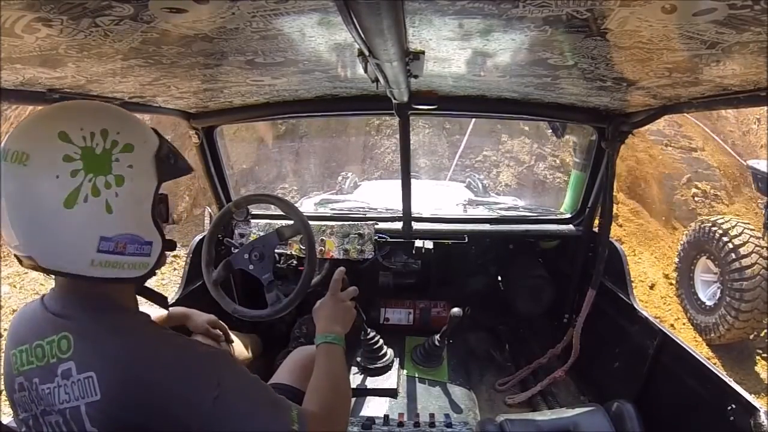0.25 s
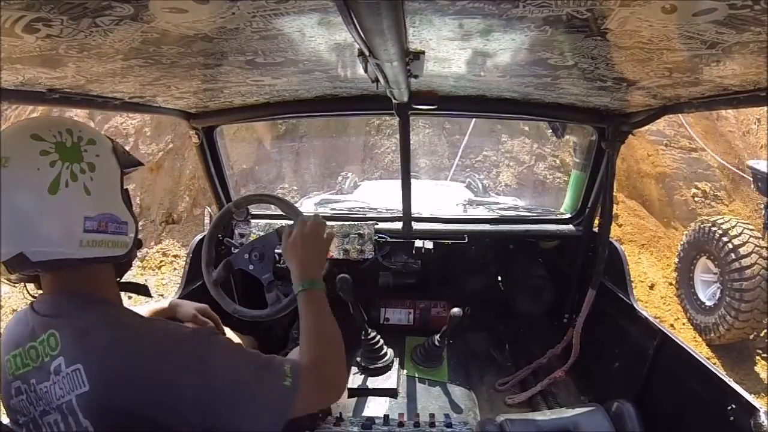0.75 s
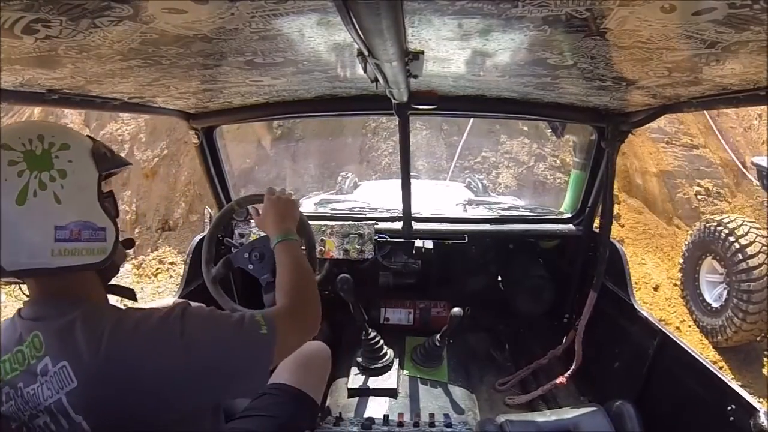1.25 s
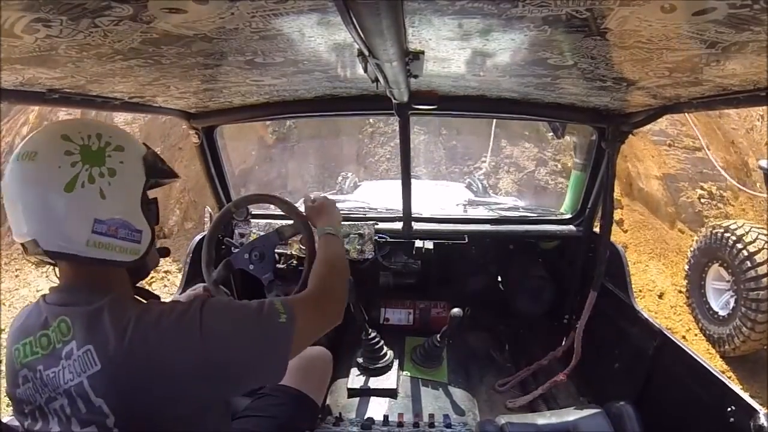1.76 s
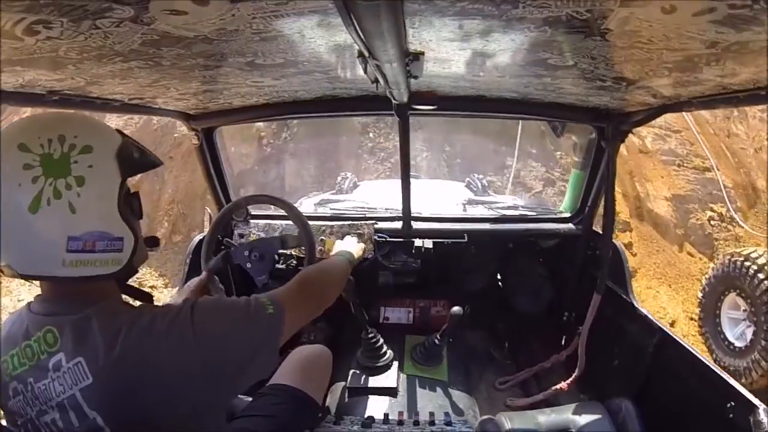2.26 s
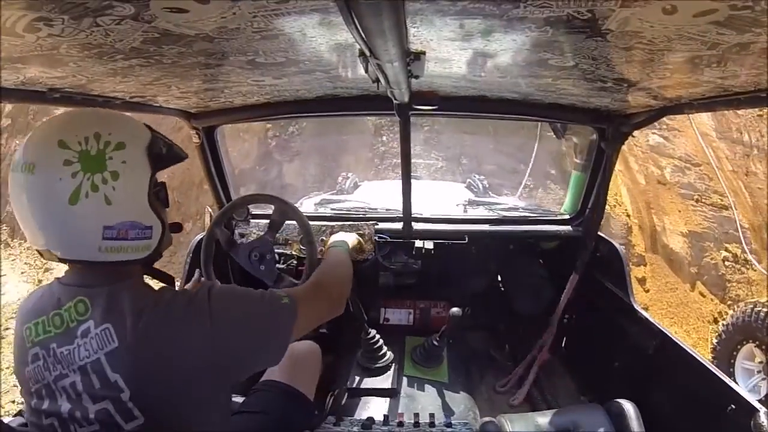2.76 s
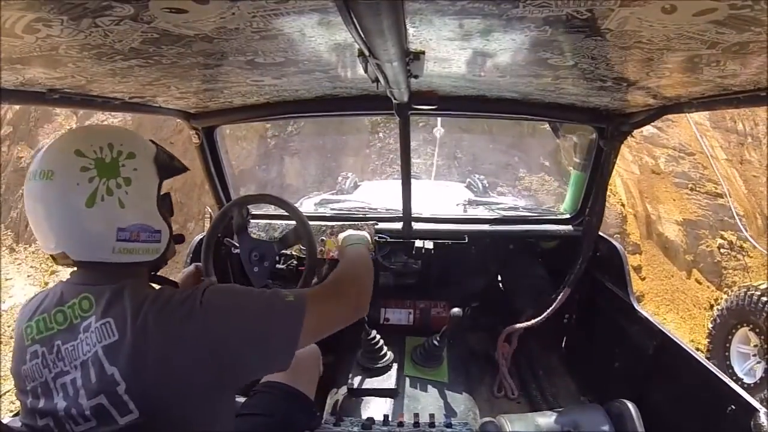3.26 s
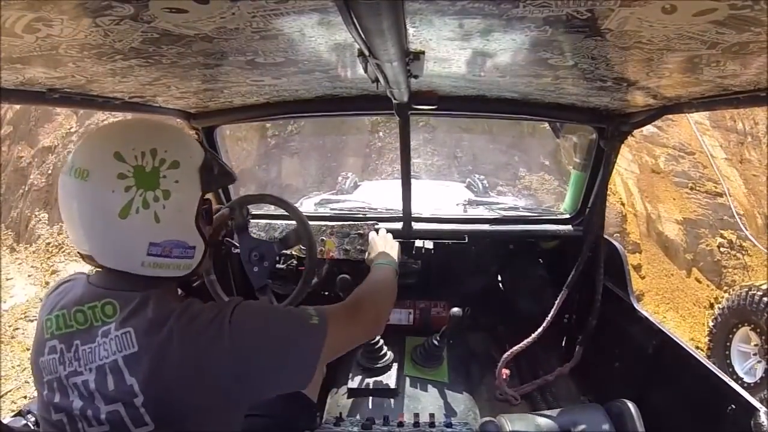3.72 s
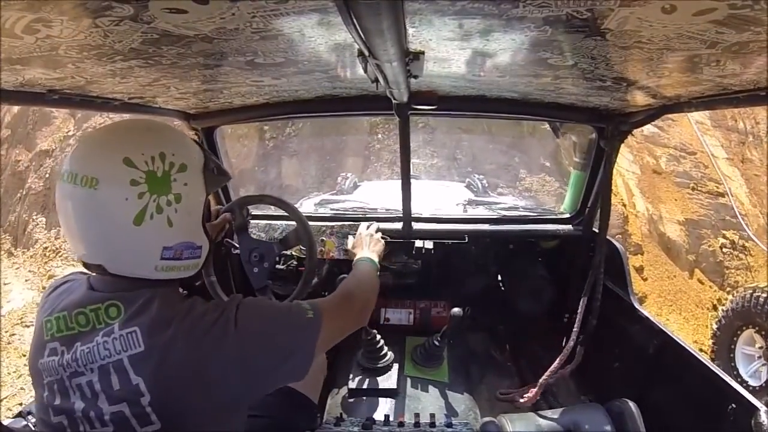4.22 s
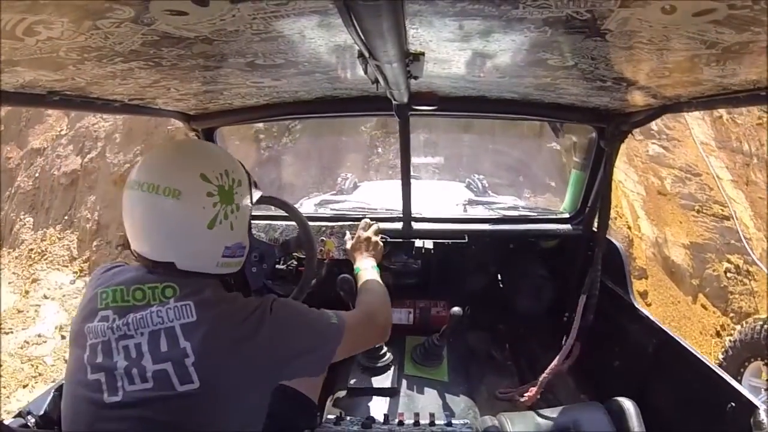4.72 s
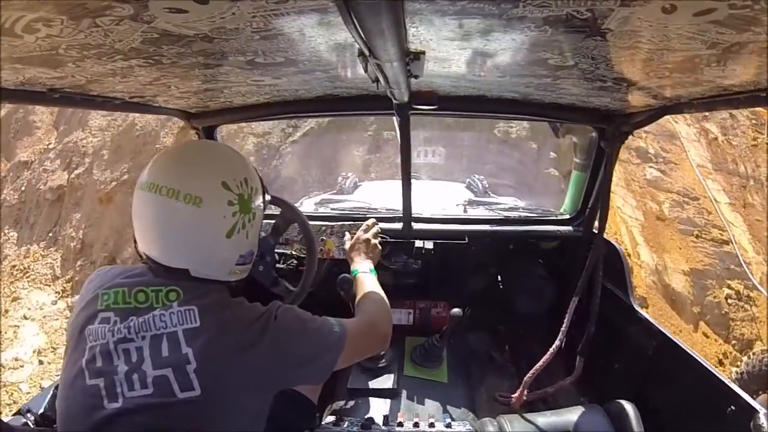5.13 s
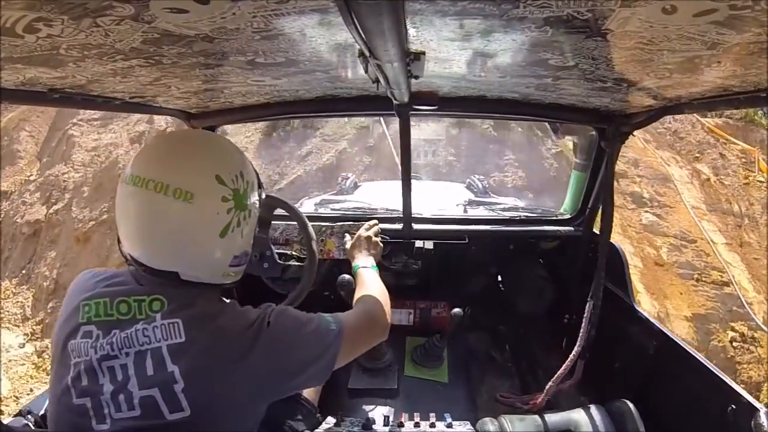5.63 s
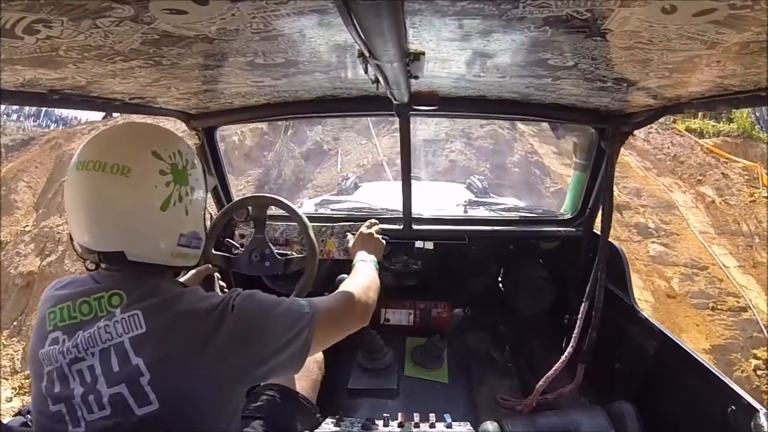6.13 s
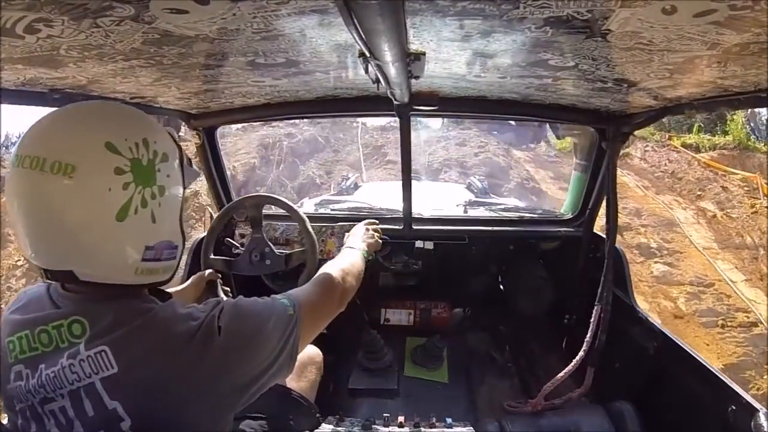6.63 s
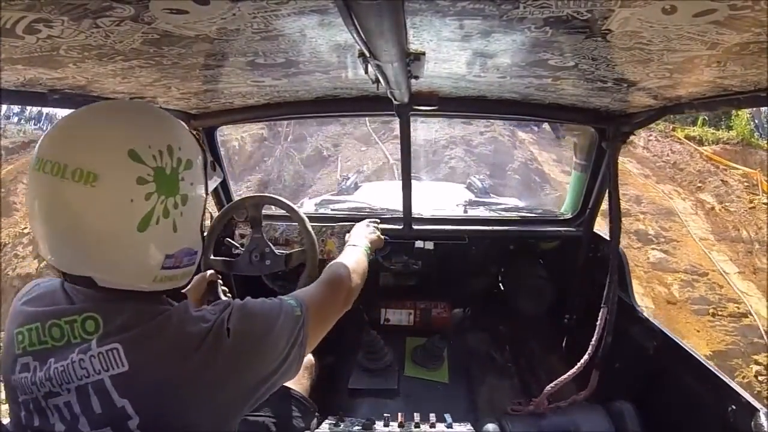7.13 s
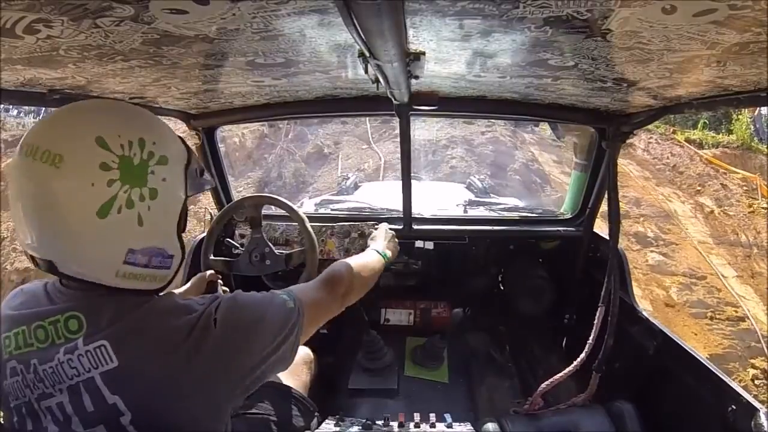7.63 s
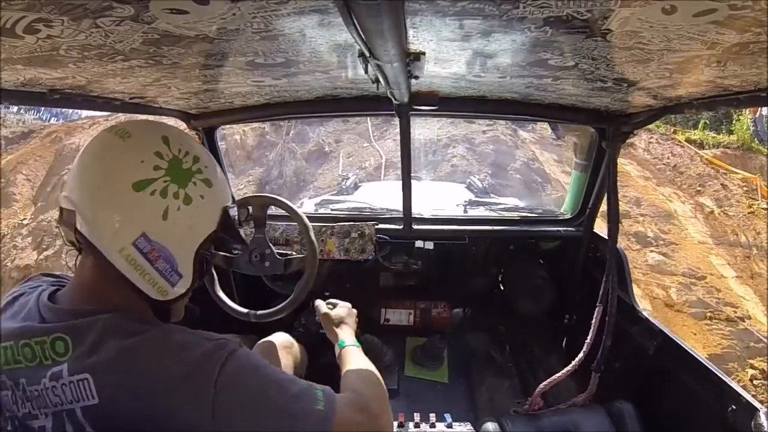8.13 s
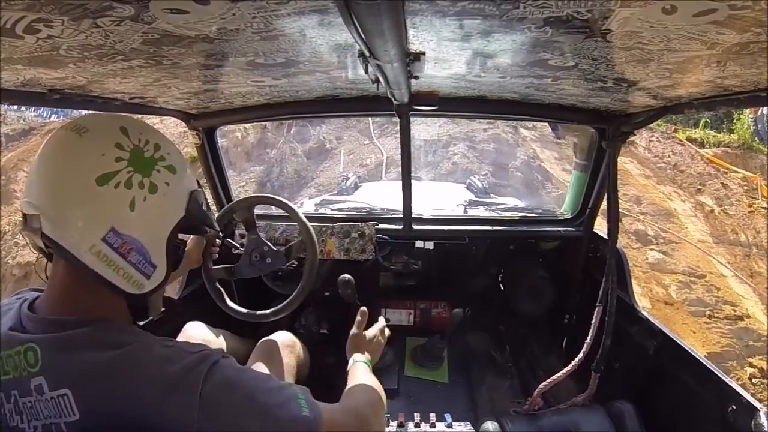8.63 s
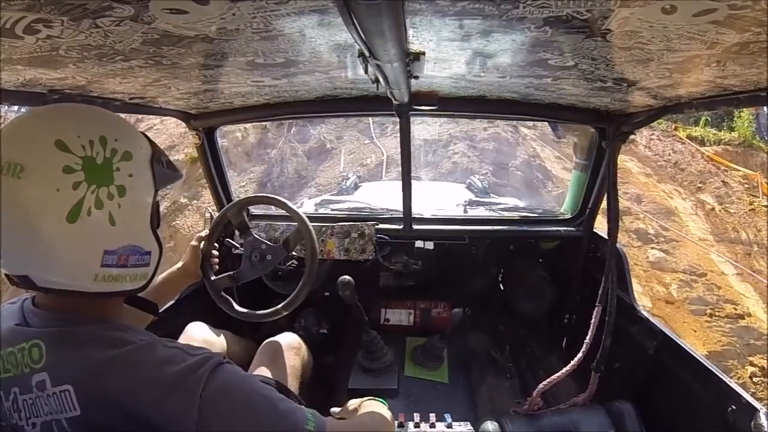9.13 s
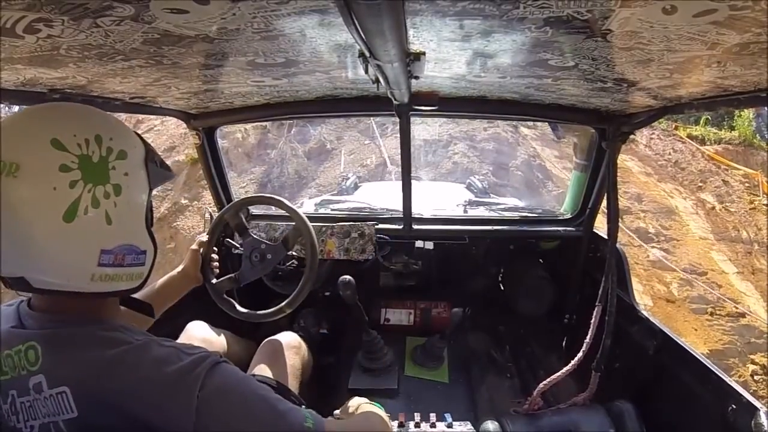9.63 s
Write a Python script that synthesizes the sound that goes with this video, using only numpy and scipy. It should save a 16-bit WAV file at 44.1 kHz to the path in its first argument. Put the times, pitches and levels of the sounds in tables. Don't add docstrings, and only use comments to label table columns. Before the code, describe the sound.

Inside a bare metal buggy cabin, a microphone in a sealed housing hears a boomy, throbbing engine at about 50 beats a second, with dry clatter, hiss and faint gear whine. At 1.0 and 1.2 s hard chassis clunks hit. The revs sag to a slow, separate chug by 2.4 s, then surge back by 3 s amid dull taps. A breathy turbine whistle sweeps upward around 3.5-4 s and runs down. Three sharp knocks come at 4.3 s as the engine lugs again to 4.9 s. From 5 to 6.7 s a loose mount hammers the housing, almost every beat. At 6.9 s a jolt lifts the revs; heavy thuds follow at 7.5 s and a bright clunk at 7.6 s with a falling squeak. Scattered knocks thicken into ringing chatter from 8.65 s, with a wavering squeak near 9.4 s, continuing to the end at 9.9 s.

```python
import sys
import numpy as np
from scipy import signal
from scipy.fft import rfft, irfft, next_fast_len
from scipy.io import wavfile
from scipy.ndimage import uniform_filter1d, minimum_filter1d

SR = 44100
rng = np.random.default_rng(int(sys.argv[2]) if len(sys.argv) > 2 else 0)


def linear_from_db(decibels):
    return 10 ** (np.asarray(decibels, float) / 20)


def bounce(signal):
    frames = np.transpose(np.atleast_2d(signal))
    limited = np.clip(frames, -1, 1)
    pcm = np.round(limited * 32767).astype(np.int16)
    wavfile.write(sys.argv[1], SR, pcm)


N = 435266

# time in seconds, load in dB.
LOAD = [(0, -0.8), (2.58, 1.7), (2.76, -15), (2.93, 1.5), (3.23, -9.5), (3.55, -10.5), (3.74, -16.5),
        (4.05, -0.5), (4.9, 1.7), (5.44, -17), (5.86, -2.5), (6.3, -21.5), (6.8, -8.5), (7.4, -2), (8.5, 3),
        (8.9, -5), (9.3, 0), (9.87, -17)]
# Hz, level in dB struck low on the mount,
# level in dB struck high on it, time to fall 60 dB in seconds.
HOUSING = [(165, -18.5, -15.5, 0.041), (240, -19.5, -16.5, 0.028), (333, -22.5, -17, 0.038),
           (706, -19, -19, 0.033), (819, -18.5, -14, 0.028), (950, -27.5, -24, 0.034),
           (1178, -15, -16.5, 0.097), (1450, -1, -4, 0.024), (1622, 1, 1.5, 0.015), (1792, -5, -1.5, 0.02),
           (2050, -15.5, -17.5, .02), (2418, -11.5, -9, 0.015), (2825, -23, -18.5, .012)]
USUAL_HZ = 47
USUAL_INTAKE_DB = -50


def evened(x):
    return x / np.sqrt(np.mean(x ** 2) + 1e-20)


def columns(rows):
    s, *values = np.transpose(rows)
    return [np.interp(np.arange(N) / SR, s, v) for v in values]


def add(mix, s, sound):
    part = mix[round(s * SR):][:len(sound)]
    part += sound[:len(part)]


def resonate(x, hz, width):
    turn = np.exp(2j * np.pi * np.cumsum(hz * np.ones(len(x))) / SR)
    r = np.exp(-np.pi * width / SR)
    return 2 * (turn * signal.lfilter([1 - r], [1, -r], x / turn)).real


def resonate_twice(x, hz, width):
    return resonate(resonate(x, hz, width), hz, width)


def coloured(x, points):
    hz, db = np.transpose(points)
    size = next_fast_len(N)
    log_hz = np.log(np.fft.rfftfreq(size, 1 / SR) + 1)
    gain = linear_from_db(np.interp(log_hz, np.log(hz), db, -120, -120))
    return evened(irfft(rfft(x, size) * gain, size)[:N])


def drift(rate_hz):
    return evened(resonate_twice(rng.standard_normal(N), 0, rate_hz))


def mottled(x):
    z = signal.stft(x, nperseg=512, noverlap=384)[2]
    patches = uniform_filter1d(rng.standard_normal(z.shape[::-1]), size=12, axis=0)
    patches = uniform_filter1d(patches, size=3, axis=1)
    swell_db = 2.2 * evened(patches).T - .6
    return signal.istft(z * linear_from_db(swell_db), nperseg=512, noverlap=384)[1][:N]


def glide(rows, width, clean):
    hz, db = columns(rows)
    t = np.arange(N) / SR
    fuzz = evened(resonate_twice(rng.standard_normal(N), hz, width))
    tone = clean * np.sin(2 * np.pi * np.cumsum(hz) / SR) + fuzz
    return linear_from_db(db) * evened(tone) * (t > rows[0][0]) * (t < rows[-1][0])


def surge():
    # time in seconds, intake level in dB.
    intake = [(0, -44.5), (1.01, -44), (1.29, -50.5), (1.84, -52), (2.09, -59), (3.08, -54.5),
              (3.95, -39.5), (3.98, -42.5), (4.62, -55.5), (5.39, -51.5), (5.99, -55), (6.24, -56),
              (6.74, -55.5), (7.01, -49.5), (7.56, -47), (7.94, -51), (8.69, -46), (9.87, -53)]
    return columns(intake)[0] - USUAL_INTAKE_DB


def loosened():
    return np.clip((np.arange(N) / SR - 6.85) / 0.083, 0, 1)


def gear_whines():
    # time in seconds, Hz, level in dB.
    whines = [
        [(5.2, 5370, -72), (5.3, 5230, -54), (5.42, 5000, -64), (5.6, 5120, -73), (5.9, 5070, -57),
         (6.05, 5050, -70)],
        [(6.55, 4260, -80), (6.8, 4200, -63.5), (7.1, 4167, -66)],
        [(7.0, 7680, -71), (7.55, 7666, -63), (7.85, 7670, -61)],
        [(0, 3945, -50.5), (1.1, 4000, -52.5), (1.6, 3970, -63), (2.0, 3940, -56.5), (2.2, 3890, -67),
         (3.05, 3930, -64), (3.16, 3970, -53), (3.45, 3840, -61), (4.2, 3840, -74)],
        [(0, 6800, -64), (.6, 7120, -68), (1.2, 7000, -65)],
    ]
    return sum(glide(rows, 45, .3) for rows in whines)


def turbine_whistle():
    # time in seconds, Hz, level in dB.
    whistle = [(3.5, 4100, -63), (3.58, 4500, -55), (3.69, 5300, -50), (3.82, 7100, -43.5),
               (3.955, 9400, -54), (3.98, 9250, -67), (4.2, 8900, -62), (4.4, 8400, -64), (4.65, 7700, -71)]
    return glide(whistle, 310, .4)


def squeaks():
    # time in seconds, Hz, level in dB.
    curves = [
        [(7.67, 1610, -38), (7.69, 1550, -26), (7.72, 1460, -23), (7.74, 1390, -27), (7.765, 1280, -36)],
        [(9.36, 1600, -43), (9.4, 1580, -28), (9.44, 1540, -37), (9.475, 1590, -24), (9.505, 1590, -31),
         (9.525, 1600, -35)],
    ]
    return sum(glide(rows, 70, 1.6) for rows in curves)


def chatter_hum():
    # time in seconds, Hz, level in dB.
    buzz = [(8.8, 840, -42.5), (8.9, 850, -48), (9.4, 805, -47), (9.95, 803, -33)]
    # time in seconds, Hz, level in dB.
    plate = [(8.8, 1560, -48), (8.95, 1550, -32), (9.03, 1480, -48), (9.12, 1580, -36), (9.3, 1610, -60),
             (9.4, 1530, -26.5), (9.5, 1540, -37.5), (9.62, 1525, -30.5), (9.95, 1620, -31.5)]
    return glide(buzz, 90, 0) + glide(plate, 300, 0)


def shell():
    # Hz, width in Hz, level in dB.
    modes = [(38.2, 7.9, -2.5), (91.34, 6.15, -1.5), (149, 21, -16)]
    # time in seconds, low mode in dB, high mode in dB.
    bumps = [(1.022, -18, -25), (1.207, -23, -9), (2.62, -19, 0), (2.951, -12, -45), (3.853, -30, -32),
             (5.33, 3.5, -32), (6.861, 0, 5), (7.002, -26, -21), (7.493, 3.5, 5.5), (7.782, -7, 6),
             (8.098, -23, -26), (8.651, 4, -3)]
    # time in seconds, road shake in dB.
    ground = [(0, -14), (.88, -39), (1.03, -11), (1.3, -19), (2.01, -26), (2.55, -39), (2.8, -24.5),
              (3.4, -21.5), (4, -13.5), (4.45, -22.5), (4.95, -37), (6, -25.5), (6.7, -29.5), (7.1, -21.5),
              (8.5, -23.5), (9.87, -22)]
    road = rng.standard_normal(N)
    hum = sum(linear_from_db(db) * evened(resonate(resonate(road, hz, w), hz, 2 * w)) for hz, w, db in modes)
    out = linear_from_db(columns(ground)[0]) * hum
    t = np.arange(SR // 2) / SR
    for s, *dbs in bumps:
        for db, (hz, width, _) in zip(dbs, modes):
            swell = (1 - np.exp(-t / 0.06)) * np.exp(-np.pi * width * t)
            add(out, s, linear_from_db(db) * swell * np.sin(2 * np.pi * hz * t))
    return out


def thuds():
    # start in seconds, Hz, peak in dB, time to fall 60 dB in seconds.
    blows = [(.97, 600, -36, 0.067), (1.199, 328, -36, 0.044), (2.6, 393, -28, 0.038),
             (4.301, 240, -23, 0.025), (5.029, 209, -27, 0.13), (4.763, 1416, -27, .05),
             (4.82, 1450, -32, 0.059), (5.284, 1545, -29.5, 0.046), (5.362, 1370, -33, 0.1),
             (2.0, 414, -31, 0.038), (2.738, 327, -33.5, 0.061), (6.86, 645, -27.5, 0.047),
             (7.065, 620, -24, 0.037), (7.49, 477, -16.5, 0.035), (7.509, 338, -23, 0.045),
             (7.638, 568, -16.5, 0.036), (7.636, 1900, -21, 0.05), (7.636, 1200, -20, 0.044),
             (7.645, 800, -27, .03), (7.747, 400, -21, 0.028), (7.774, 312, -19, 0.041),
             (7.857, 390, -29, 0.048), (8.622, 352, -19, 0.021), (8.653, 328, -32, 0.15),
             (8.792, 415, -29, 0.046), (9.363, 450, -32, 0.15), (9.45, 450, -27.5, 0.11)]
    sag, sag_s, jolt_s = .25, .015, .013
    out, jolts = np.zeros(N), np.zeros(N)
    t = np.arange(SR // 2) / SR
    for s, hz, db, t60 in blows:
        low = hz < 540
        bent_t = t - low * sag * sag_s * np.exp(-t / sag_s)
        swell = linear_from_db(db + 9.0 - 60 * t / t60) * (1 - np.exp(-(t / 0.0073) ** 2))
        add(out, s, swell * np.sin(2 * np.pi * hz * bent_t))
        add(jolts, s, low * linear_from_db(db - 12.5) * t / jolt_s * np.exp(1 - t / jolt_s))
    rumble = coloured(rng.standard_normal(N), [(120, -11.5), (200, 6.5), (500, -6), (900, -9), (1050, -24.5)])
    return out + jolts * rumble


def clunks():
    # start in seconds, peak in dB, brightness in dB an octave, length in seconds.
    clusters = [
        (1.006, -11, 0, 0.013),
        (1.207, -16, -3, 0.009),
        (1.268, -31, 8, 0.0022),
        (2.566, -30, -10, 0.089),
        (2.676, -29, -8, 0.0033),
        (2.723, -36, -4, 0.0024),
        (2.803, -20, 2, 0.017),
        (3.085, -25, -2, 0.0042),
        (3.84, -18.5, -5.5, 0.0092),
        (7.632, -11, 5, 0.015),
    ]
    # Hz, width in Hz, level in dB.
    chassis = [(640, 126, -3), (822, 32, -1), (1370, 73, 4), (1620, 120, 6.5), (1792, 96, 1.5),
               (2120, 320, -26.5)]
    out, t = np.zeros(N), np.arange(4000) / SR
    for s, peak_db, bright_db, length in clusters:
        c = rng.standard_normal(len(t))
        contacts = c * abs(c) * (t / length) * np.exp(-(t / length) ** 2)
        sound = sum(linear_from_db(db + bright_db * np.log2(hz / 1500)) * resonate(resonate(contacts, hz, w), hz, 2 * w)
                    for hz, w, db in chassis)
        add(out, s - .002, linear_from_db(peak_db) * sound / abs(sound).max())
    return out


def ticks(turns, rate):
    at = np.flatnonzero(np.diff(np.floor(turns + 0.81)))
    taps = np.zeros(N)
    taps[at] = linear_from_db(2.4 * rng.standard_normal(len(at)))
    t = np.arange(300) / SR
    parts = [(760, 3.0, 0.00035), (1790, -9.5, 0.00037), (3220, -13.5, 0.00013),
             (4630, -11.0, 0.0003), (2600, -13.5, 0.0001)]
    tick = sum(linear_from_db(db) * np.sin(2 * np.pi * hz * t) * t / s * np.exp(1 - t / s) for hz, db, s in parts)
    faster_hz = rate - USUAL_HZ
    tick_db = -54 - 1.4 * faster_hz - 0.42 * columns(LOAD)[0] + 7 * loosened()
    snap = np.exp(-((t - .001) / .00005) ** 2) - np.exp(-((t - .001) / .0004) ** 2) / 8
    snap_db = -56 - 1.3 * faster_hz
    snaps = signal.oaconvolve(linear_from_db(snap_db) * taps, snap / abs(snap).max())[:N]
    return signal.oaconvolve(linear_from_db(tick_db) * taps, tick)[:N] + snaps


def clatter(turns, rate, mount):
    # Hz, dB per Hz.
    rumble_points = [(74, -12), (125, -9.5), (146, -14), (244, -26), (366, -26), (415, -35.5), (462, -29.5),
                     (652, -29), (713, -35.5), (809, -31), (1080, -44), (1400, -87), (2380, -120)]
    body_points = [(590, -41.5), (1000, -43), (1070, -47.5), (1150, 4), (1330, 8.5), (1560, 11), (2040, 0),
                   (2410, -2), (2590, -13.5), (2900, -36), (3770, -38.5), (6380, -120)]
    hiss_points = [(1530, -38.5), (2600, -2.5), (3160, 5.5), (3720, 5), (3890, 3.5), (4100, 0), (4160, -12),
                   (4340, -6.5), (4530, -8.5), (5010, 3), (5450, -2.5), (8020, -6), (9200, -26.5),
                   (12000, -58.5), (20200, -120)]
    air_points = [(5000, -27), (8500, -1.5), (9090, -6.5), (11100, -6.5), (12200, -9), (13500, -12),
                  (15100, -12.5)]
    # Hz, width in Hz, level in dB.
    hums = [(3970, 93, -21), (5077, 110, -11.5), (7190, 50, -25.5)]
    dropouts = [.54, 4.44, 4.737, 5.3, 5.5, 8.17, 8.56]
    slowness = (47 / rate) ** 3.5
    strength = linear_from_db(2.5 * rng.standard_normal(int(turns[-1]) + 1))[(turns - .88).astype(int)]
    puff = slowness * strength * np.exp(-(((turns + .12) % 1) / .45) ** 2)

    def band(points, depth):
        swell = (1 + depth * puff) / (1 + 0.19 * depth * slowness)
        return coloured(swell * rng.standard_normal(N), points)

    rumble, body = band(rumble_points, .5), band(body_points, .6)
    hiss, air = band(hiss_points, .25), band(air_points, .2)
    noise = rng.standard_normal(N)
    for hz, width, db in hums:
        hiss = hiss + linear_from_db(db + 3.0 * drift(8.6)) * evened(resonate_twice(noise, hz, width))

    shaken = np.sqrt(abs(resonate(mount ** 2, 0, 1 / (np.pi * 0.011))))
    rumble_db = -34.5 + 0.58 * surge() + 0.094 * columns(LOAD)[0] + 3 * loosened()
    low = (linear_from_db(rumble_db) + linear_from_db(-19.5) * shaken) * rumble
    body_db = -40.5 + 0.8 * surge() + 1.5 * loosened() + 0.23 * np.minimum(rate - 40, 0)
    lug_db = -57 - (rate - USUAL_HZ)
    lug = evened((slowness + 1.5 * puff) * resonate_twice(noise, 1826, 240)) / slowness

    hiss_db = surge() + USUAL_INTAKE_DB
    air_db = 1.1 * surge() - 63.5
    dips = sum(np.exp(-((np.arange(N) / SR - s) / .011) ** 4) for s in dropouts)
    flicker = linear_from_db(1.28 * drift(8.1) - 14 * dips)
    treble = flicker * mottled(linear_from_db(hiss_db) * hiss + linear_from_db(air_db) * air)
    return low + linear_from_db(body_db) * body + linear_from_db(lug_db) * lug + treble


def ring(s, chance_db):
    signs = [1, -1, 1, -1, 1, -1, -1, 1, -1, 1, 1, 1, -1]
    t = np.arange(4000) / SR
    hz, low_db, high_db, t60 = np.transpose(HOUSING)[:, :, None]
    db = (low_db if s < 7.5 else high_db) + chance_db[:, None]
    sound = (np.c_[signs] * linear_from_db(db - 60 * t / t60) * np.sin(2 * np.pi * hz * t)).sum(0)
    sound *= np.sin(np.pi / 2 * np.minimum(t / 0.0013, 1)) ** 2
    add(sound, 0.00477, linear_from_db(-16.5 + 2 * chance_db[0]) * sound)
    return sound / abs(sound).max()


def knocks():
    # time in seconds, peak in dB.
    mount_blows = [(1.0115, -18), (1.2105, -21), (2.807, -27.5), (4.978, -24), (6.737, -31), (6.9801, -19),
                   (7.5362, -17.5), (7.142, -29), (7.515, -21), (7.591, -29), (7.6397, -20), (7.817, -26.5),
                   (7.836, -31), (7.89, -30), (9.002, -35), (9.44, -21), (9.4815, -21), (9.503, -22),
                   (4.28, -18), (4.3034, -10.0), (4.326, -6), (4.737, -24), (4.948, -23.5), (4.983, -16),
             (5.0084, -8.5), (5.0373, -8), (5.0586, -23), (5.0901, -4.5), (5.4059, -9.5), (5.427, -6.5),
             (5.4502, -10), (5.472, -3), (5.494, -6.5), (5.5159, -3.5), (5.5378, -10), (5.5606, -6.5),
             (5.583, -11.5), (5.604, -7.5), (5.628, -17), (5.649, -8.5), (5.692, -9), (5.78, -10.5),
             (5.931, -9), (5.973, -5), (5.998, -22), (6.0176, -6.5), (6.0424, -37), (6.0618, -7.5),
             (6.1081, -9.5), (6.1533, -9.5), (6.178, -29), (6.198, -4), (6.224, -23), (6.2416, -4.5),
             (6.2649, -8), (6.287, -11), (6.3111, -4), (6.3326, -4.5), (6.3567, -5.5), (6.38, -4.5),
             (6.4028, -4.5), (6.4264, -5.5), (6.449, -5), (6.4722, -3), (6.4946, -4.5), (6.518, -5),
             (6.5416, -7), (6.565, -9.5), (6.588, -16), (6.6139, -16.5), (6.6355, -10), (6.6619, -17.5),
             (6.685, -26), (6.71, -20), (6.7602, -20.5),
                   (7.697, -30), (7.7218, -19), (7.7879, -20), (7.929, -14), (7.9533, -21), (7.9907, -23),
             (8.0299, -13), (8.143, -18.5), (8.274, -21.5), (8.4093, -15), (8.55, -28), (8.585, -20),
             (8.6613, -5.5), (8.679, -9.5), (8.7217, -9.5), (8.7547, -23.5), (8.858, -23.0),
             (8.8789, -10.5), (8.9009, -5.5), (8.9233, -8), (8.943, -2), (8.9612, -9), (8.981, -25),
             (9.022, -16.5), (9.064, -11.5), (9.0842, -14.5), (9.1067, -11.5), (9.1277, -9.5), (9.148, -8),
             (9.169, -6), (9.1893, -11.5), (9.2099, -26), (9.231, -9.5), (9.251, -17), (9.2725, -15),
             (9.2936, -25), (9.3148, -10), (9.3343, -21), (9.356, -13), (9.379, -25), (9.399, -12),
             (9.424, -14.5), (9.4595, -10), (9.5253, -12.5), (9.5654, -16), (9.586, -19), (9.608, -9.5),
             (9.6332, -18), (9.6538, -8), (9.675, -8), (9.6971, -6.5), (9.72, -10), (9.742, -13),
             (9.7647, -9.5), (9.7872, -8.5), (9.8103, -7.5), (9.834, -4), (9.8591, -8.5)]
    out = np.zeros(N)
    hz = np.transpose(HOUSING)[0]
    octaves_above = np.maximum(np.log2(hz / 1700), 0)
    octaves_below = np.clip(np.log2(1300 / hz), 0, .7)
    tilt = 1.13 * octaves_above - .5 * octaves_below
    for s, peak_db in mount_blows:
        chance_db = 1.2 * rng.standard_normal(len(HOUSING)) + (peak_db + 5.5) * tilt
        add(out, s - .0013, linear_from_db(peak_db) * ring(s, chance_db))
    lid = resonate(resonate_twice(out, 3700, 650), 3700, 650)
    edge = signal.butter(8, 3150, fs=SR, output="sos")
    return signal.sosfilt(edge, out) + linear_from_db(7) * lid


def exhaust(turns, rate):
    # multiple of the firing rate, level in dB.
    weak_orders = [(.5, -42), (.75, -33), (1.25, -45), (1.5, -42), (1.75, -28), (2.25, -31), (2.5, -33),
                   (3.25, -44), (3.5, -44), (4, -37), (4.5, -46), (5, -49), (5.5, -47), (6, -41), (7, -49),
                   (8, -52), (8.38, -39), (9, -53), (10, -52), (11, -54), (12, -47), (13.1, -41), (15, -52)]
    # dB at the pipe, share of load and share of intake they follow.
    strong_orders = [(0.85, 0.38, .02), (0.38, 0.79, 0.018), (-22, 0.086, .7)]
    # Hz, level in dB.
    boom = [(37.5, -7.5), (47, -19.5), (53, -15.5), (72, -32.5), (89, -10.5), (110, -21.5), (144, -12),
            (160, -25.5)]
    # lag in turns, boom in Hz, width in Hz.
    lags = [(.063, 52.9, 1.5), (.044, 89.5, 1.2), (0, 148, 20)]
    # time in seconds, first, second and third order in dB.
    twist = [(0, -6, 2, 5.5), (.95, 1, 0.5, -0.5), (1.2, -15.5, 2, 1.5), (1.7, 0.5, 2, 4),
             (2.3, -2, -2.5, -8.5), (3.1, 0, 1.5, 4.5), (3.77, -1, 4.5, 1), (4.3, -0.5, 4, -2),
             (5.1, -2, -3, -1.5), (5.45, -3.5, -2.5, -10), (5.85, -5.5, 3.5, 5), (6.4, -9.5, 7.5, 7.5),
             (6.8, -5, -12, -4), (7.3, -4, 3.5, 0), (8.1, -3.5, -6, -2), (8.55, 1.5, 1, 0),
             (9.0, -5.5, -2.5, -6.5), (9.7, 1.5, 9, -7)]
    load_db, twist_db = columns(LOAD)[0], columns(twist)
    boom_hz, boom_db = np.transpose(boom)
    strong, weak = 0, 0
    for k, (pipe_db, load_share, intake_share) in enumerate(strong_orders, 1):
        db = pipe_db + twist_db[k - 1] + load_share * load_db + intake_share * surge()
        db = db + np.interp(np.log(k * rate), np.log(boom_hz), boom_db)
        lag, hz, width = lags[k - 1]
        phase = 2 * np.pi * lag - np.arctan((k * rate - hz) / width)
        strong = strong + linear_from_db(db) * np.cos(k * 2 * np.pi * turns + phase)
    for k, db in weak_orders:
        dulled_db = -3.5 * max(np.log2(k / 2), 0)
        wave = np.sin(2 * np.pi * (k * turns + rng.random()))
        weak = weak + linear_from_db(db + dulled_db + 3.3 * drift(5.8)) * wave
    uneven_db = -7.5 + surge() + 0.41 * load_db
    return np.sqrt(2) * (strong + linear_from_db(uneven_db) * weak)


def scene():
    # time in seconds, firing rate in Hz.
    speed = [(0.0, 49.57), (0.88, 49.5), (1.082, 46.93), (1.584, 42.79), (2.091, 34.7), (2.455, 32.27),
             (2.972, 48.66), (4.036, 46.25), (4.532, 35.59), (4.856, 32.13), (5.321, 44.37), (5.936, 46.13),
             (6.823, 39.89), (6.89, 53.98), (8.728, 51.57), (8.73, 47.53), (9.531, 48.14), (9.87, 43.59)]
    rate = columns(speed)[0]
    turns = np.cumsum(rate) / SR
    mount = knocks()
    tones = gear_whines() + turbine_whistle() + squeaks() + chatter_hum()
    chassis = shell() + thuds() + clunks()
    engine = ticks(turns, rate) + clatter(turns, rate, mount) + exhaust(turns, rate)
    return (tones + chassis + engine + mount)[None]


def low_pass(x):
    return signal.sosfilt(signal.butter(12, 15260, fs=SR, output="sos"), x)


def record(dry):
    room = np.minimum(.84 / (abs(dry) + 1e-9), 1)
    held = dry * uniform_filter1d(minimum_filter1d(room, size=400), size=400)
    edge = signal.firwin(301, 15150, window=("kaiser", 8), fs=SR)
    padded = np.pad(held, ((0, 0), (150, 150)), "edge")
    return low_pass(signal.oaconvolve(padded, edge[None], "valid"))


dry = scene()
out = record(dry)
bounce(out)
```